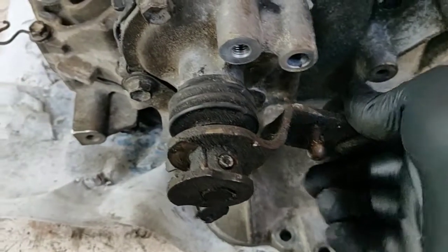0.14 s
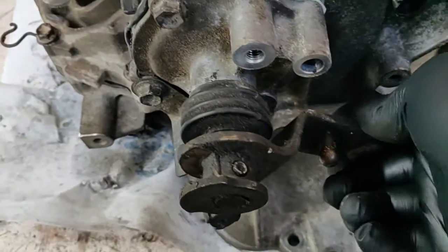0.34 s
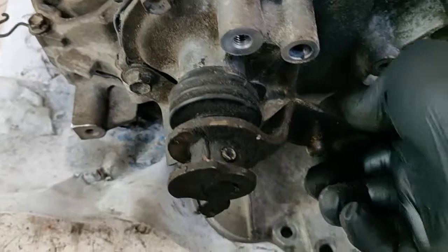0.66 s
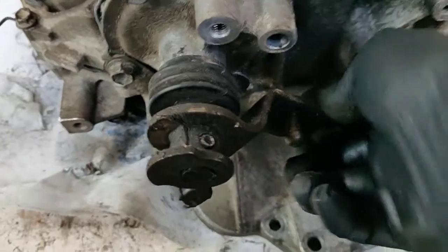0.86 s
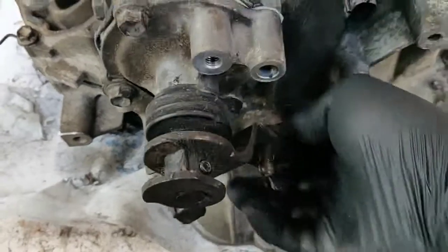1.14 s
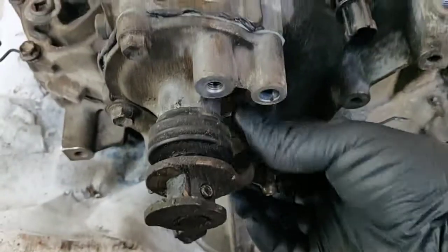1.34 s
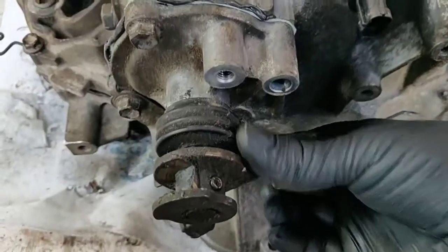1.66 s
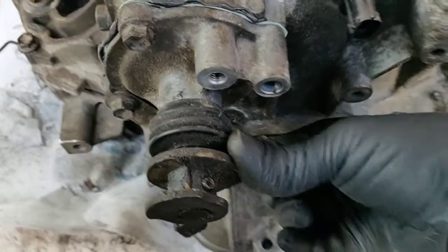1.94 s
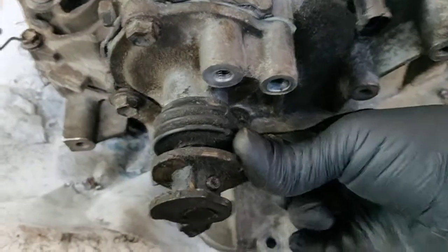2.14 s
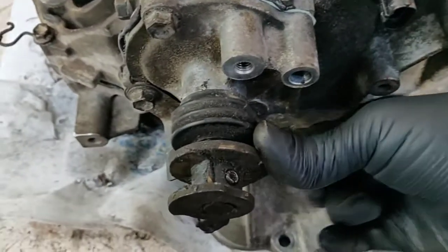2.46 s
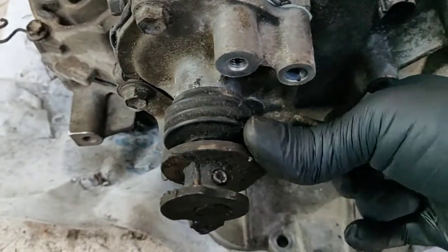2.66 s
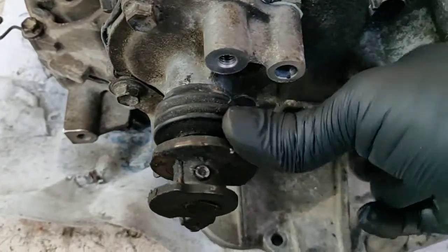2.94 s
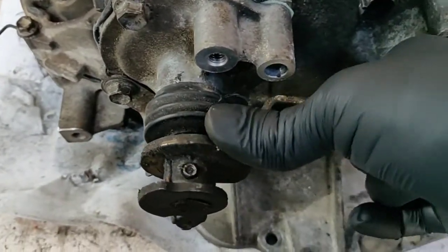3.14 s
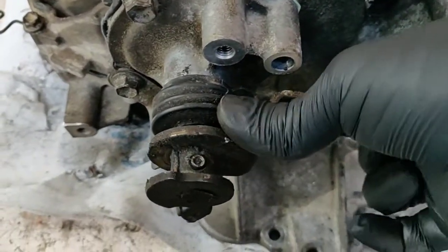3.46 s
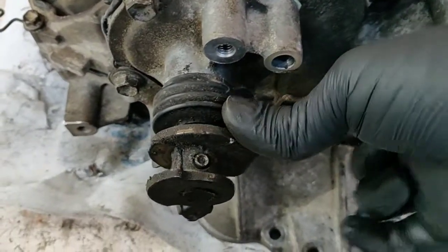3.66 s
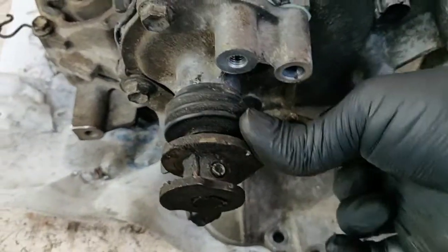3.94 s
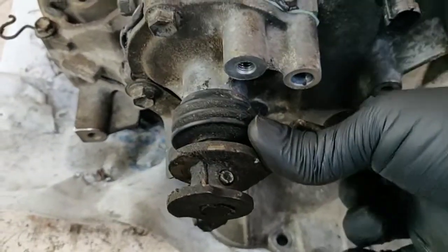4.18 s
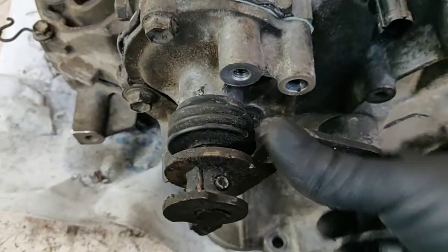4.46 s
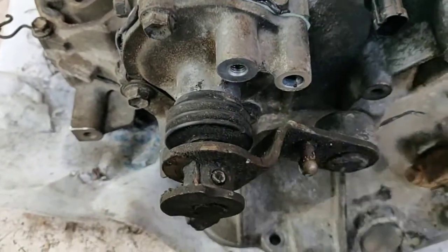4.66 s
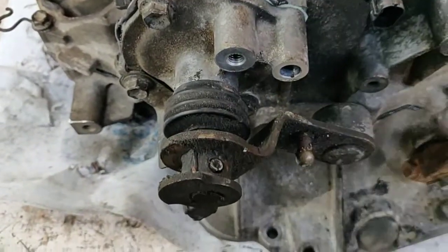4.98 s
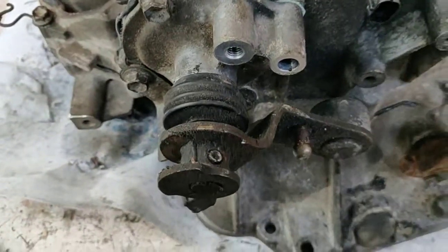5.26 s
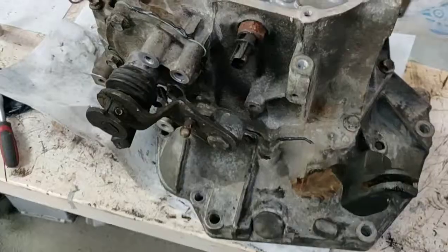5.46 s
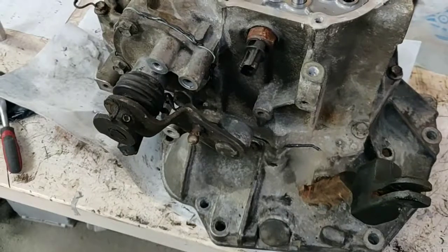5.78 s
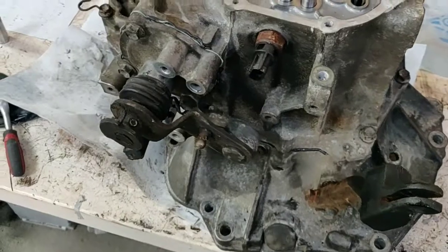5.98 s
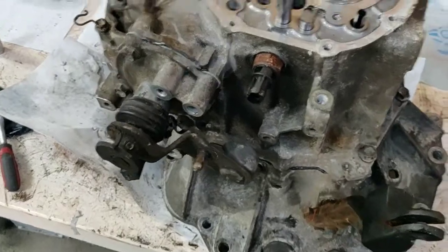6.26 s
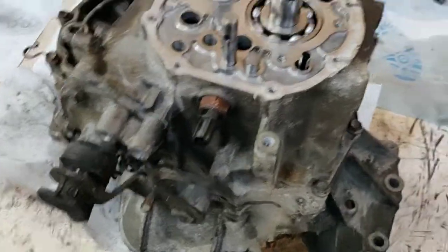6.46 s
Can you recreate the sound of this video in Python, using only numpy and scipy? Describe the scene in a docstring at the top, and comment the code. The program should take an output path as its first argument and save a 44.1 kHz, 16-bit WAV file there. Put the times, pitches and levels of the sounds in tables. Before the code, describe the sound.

Close to a phone in a small workshop, a hand works a gearbox selector over low hum and fan noise. A loud double clack lands at one second, followed by two more near three and another before four, each with a dull casing thud. Quiet fan noise remains, then the sound drops out, returns faintly with hiss, and ends in blunt taps and a short rub on the left.

```python
"""Gearbox selector on a workbench.

A gloved hand works the selector shaft of a gearbox casing close to a phone, over mains hum and fan noise.
Each shift clatters steel on steel as filtered noise and ringing modes; swelling sines thud on the bench.
Late on come a bump on the right and a tap on the left, then a dropout and a fade back.
After it: hiss, a low throb on the right, then rubbing, taps and a slide on the left."""
import sys
import numpy as np
from scipy import signal
from scipy.fft import rfft, irfft, next_fast_len
from scipy.io import wavfile
from scipy.ndimage import uniform_filter1d

SR = 44100
rng = np.random.default_rng(int(sys.argv[2]) if len(sys.argv) > 2 else 0)


def log_audio(samples):
    """Write samples as a 16-bit WAV file to the path given in sys.argv[1]."""
    # one column per channel
    frames = np.atleast_2d(samples).T
    # limit to full scale, then quantise
    limited = np.clip(frames, -1, 1)
    pcm = np.round(limited * 32767).astype(np.int16)
    wavfile.write(sys.argv[1], SR, pcm)


N = 291942


def undb(db):
    """Decibels to gain."""
    return 10 ** (np.asarray(db) / 20)


def unit(x):
    """Scale to rms 1."""
    return x / np.sqrt(np.mean(x ** 2))


def colour(x, points):
    """Causal minimum-phase filter through (hz, db) points, built by folding the cepstrum."""
    size = 2 * next_fast_len(x.shape[-1] // 2 + 2048, real=True)
    hz, db = np.transpose(points)
    f = np.maximum(np.arange(size // 2 + 1) * SR / size, 1)
    cepstrum = irfft(np.interp(np.log(f), np.log(hz), np.log(undb(db))))
    cepstrum[1:size // 2] *= 2
    cepstrum[size // 2 + 1:] = 0
    response = np.exp(rfft(cepstrum))
    return irfft(rfft(x, size) * response)[..., :x.shape[-1]]


def fall(t, t60_s):
    """Exponential decay, 60 dB in t60_s."""
    return np.exp(-np.log(1000) * t / t60_s)


def swell(start_s, attack_s, hold_s, release_s, depth_db=40):
    """Gain over time: rises and dies away at even rates in dB, spanning depth_db in attack and release."""
    t = np.arange(N) / SR
    before = (start_s + attack_s - t) / attack_s
    after = (t - start_s - attack_s - hold_s) / release_s
    return undb(-depth_db * np.maximum(0, np.maximum(before, after)))


def curve(rows):
    """Gain over time from (time_s, level_db) rows."""
    return undb(np.interp(np.arange(N) / SR, *np.transpose(rows)))


def walk(knots_per_s):
    """Slow random drift with a spread near 1."""
    knots = rng.standard_normal(N // 100)
    return np.interp(np.arange(N) / SR * knots_per_s, np.arange(len(knots)), knots)


def diffuse(size, alike_hz=700):
    """Noise from all round: the bass reaches both microphones alike, the treble does not."""
    mid, side = rfft(rng.standard_normal((2, size)))
    hz = np.arange(len(mid)) * SR / size
    alike = .96 / (1 + (hz / alike_hz) ** 3)
    shared = mid * np.sqrt(1 + alike)
    opposed = np.array([[1], [-1]]) * side * np.sqrt(1 - alike)
    return irfft(shared + opposed, size) / np.sqrt(2)


def add(out, s, x):
    """Mix x into out from time s."""
    i = int(s * SR)
    out[:, i:i + x.shape[-1]] += x[..., :N - i]


# fan and workshop air, relative spectrum: hz, density_db
AIR_SPECTRUM = [(20, -9), (55, 8.5), (90, -1), (150, -1), (200, -2.5), (280, -2), (335, -3), (500, 3.5),
                (1100, 2.5), (1800, 2), (3000, -7.5), (4700, -9.5), (6100, -9.5), (7000, -21),
                (8400, -34.5), (10000, -54.5)]
# low rumble, relative level: time_s, level_db
RUMBLE_LEVEL = [(0.0, -43), (0.71, -53.5), (4.39, -48.5), (4.68, -50), (5.03, -44), (5.15, -45),
                (5.22, -47)]
# mains harmonics, relative rms: multiple, level_db
HUM_HARMONICS = [(1, -62), (2, -40.5), (3, -48), (4, -43)]
# wavering fan tones, relative rms: pitch_hz, level_db
FAN_TONES = [(99.6, -58), (478.5, -56.5), (518.6, -47.5), (658.4, -53), (933, -53.5), (983, -59.5),
             (1196, -54.5)]


def fan(air_db=-35, rumble_db=5, rumble_swing_db=2.0, waver=0.38, hum_waver=0.1, mains_hz=59.92):
    """Steady moving air, an uneven rumble, the motor's hum and the blades' tones."""
    t = np.arange(N) / SR
    air = undb(air_db) * unit(colour(diffuse(N), AIR_SPECTRUM))

    low = [(15, -6), (40, -12), (55, -1.5), (75, -11.5), (300, -55.5), (1000, -77.5)]
    rumble = unit(colour(diffuse(N), low)) * curve(RUMBLE_LEVEL)
    rumble = rumble * undb(rumble_db + rumble_swing_db * walk(4.6))

    hum = np.zeros(N)
    for multiple, db in HUM_HARMONICS:
        hum += undb(db) * np.sin(2 * np.pi * (multiple * mains_hz * t + rng.random()))
    hum = hum * (1 + hum_waver * walk(6))

    tones = np.zeros(N)
    for hz, db in FAN_TONES:
        level = undb(db) * (1 + waver * walk(9.1))
        phase_drift_rad = 2 * waver * walk(10)
        tones += level * np.sin(2 * np.pi * hz * t + phase_drift_rad)
    return air + rumble + np.sqrt(2) * (hum + tones)  # sqrt(2): sine rms to peak


# selector against its stops: start_s, level_db, tilt_db_per_octave, first_bounce_loss_db, thud_db, thud_hz
BLOWS = [(1.028, -17, -4, -8, -20, 316), (1.0391, -6, -2, -18.5, -32, 295),
         (1.0488, -1.5, -1.5, -8, -11, 277.5), (2.003, -36, -3, -18, -55, 300),
         (2.631, -32, 13, -12, -54, 300), (2.6485, -7, 1.5, -7, -22, 315),
         (3.036, -13.5, -1, -1.5, -17.5, 300), (3.0683, -6, 0, -6, -11, 277),
         (3.4184, -37, -1, -9, -26.5, 284), (3.7684, -23.5, -1.5, -18, -43, 300),
         (3.8396, -8, -1.5, -8.5, -21, 300), (4.0425, -34.5, -3, -16, -57, 300)]
# the hand leans on the lever and rocks the casing without a click: start_s, level_db, pitch_hz
NUDGES = [(.488, -35, 265), (.983, -25.5, 316), (3.015, -24, 297)]


def rockings(lag_s=.003, back_s=0.01442, back_db=-9, back_ratio=0.868):
    """Casing thuds as (s, db, hz): to, then fro weaker and lower after each blow; once for a nudge."""
    for s, _, _, _, db, hz in BLOWS:
        yield s + lag_s, db, hz
        yield s + lag_s + back_s, db + back_db, hz * back_ratio
    yield from NUDGES


def bench(peak_s=0.0099, steepness=2.2, low_ratio=0.86, low_db=-10, high_ratio=1.204, high_db=-11):
    """The heavy casing takes a few cycles to get moving, then the bench damps it."""
    out, t = np.zeros((2, N)), np.arange(SR // 6) / SR
    heave = (t / peak_s * np.exp(1 - t / peak_s)) ** steepness
    for s, db, hz in rockings():
        turn = 2 * np.pi * hz * t
        low = undb(low_db) * np.sin(low_ratio * turn)
        high = undb(high_db) * np.sin(high_ratio * turn)
        add(out, s, undb(db) * heave * (np.sin(turn) + low + high))
    return out


def workshop(x, wet_db=-14, t60_s=0.53, delay_s=0.011):
    """A faint, diffuse echo from the walls, which swallow the highest treble."""
    t = np.arange(SR // 2) / SR
    tail = colour(diffuse(len(t)), [(6500, -3), (9000, -6), (12000, -16.0)])
    tail = tail * fall(t, t60_s) * (1 - np.exp(-(t / delay_s) ** 2))
    tail = tail / np.sqrt(t60_s * SR / np.log(10 ** 6))  # near unit energy
    return undb(wet_db) * signal.fftconvolve(x, tail, axes=1)[:, :N]


def contacts(bounces=3, touch_db=-4, seat_s=.0023, gap_s=.0062, widening=1.75, easing=0.58, bounce_tilt=-1.8):
    """Contacts as (s, db, tilt): a touch, the seating, then bounces ever further apart, weaker and duller."""
    for s, db, tilt, loss_db, _, _ in BLOWS:
        yield s, db + touch_db, tilt
        s = s + seat_s
        for k in range(bounces + 1):  # k = 0 is the seating
            yield s, db + k ** easing * loss_db, tilt + k * bounce_tilt
            s = s + gap_s * widening ** k


# casing and lever modes, relative level: pitch_hz, level_db, t60_s
CASING_MODES = [(619, -10, .12), (786, -13, .13), (958, -3, .12), (1056, -6, .12), (1220, -10, .1),
                (1330, -11, .1), (1560, -9, .1), (1930, -7, .09), (2370, -7, .1), (2464, -4, .12),
                (2560, -5, .12), (2702, 1, .13), (3006, -1, .12), (3417, -3, .12), (3705, -5, .1),
                (3970, 0, .1), (4090, 0, .09), (4265, 0, .11), (4860, -2, .08), (5160, -2, .08),
                (5639, 3, .1), (5910, 3, .1), (6072, 2, .09), (7060, -16, .08)]
# bright crack of a contact, relative spectrum: hz, density_db
CRACK_SPECTRUM = [(25, -28), (90, -17.5), (250, 6.5), (450, -10), (1000, -1.5), (2000, -6.5), (2700, -0.5),
                  (3400, -4), (4150, 3.5), (5000, 0.5), (6000, 5), (7000, -10.5), (8500, -17.5),
                  (10500, -41), (15000, -44)]
# high treble at the first instant of a contact, relative spectrum: hz, density_db
SPIT_SPECTRUM = [(3000, -28.5), (6500, 6.5), (9000, -25), (10500, -23.5), (14000, -10.5), (16000, -25)]


def selector(crack_t60_s=0.044, ring_db=-15, rise_s=0.00078, scatter_db=2.0,
             spit_db=-19, spit_t60_s=0.014, own_db=1):
    """Each contact cracks through the casing's dense short modes and leaves its strongest ones ringing."""
    out, t = np.zeros((2, N)), np.arange(SR // 6) / SR
    hz, mode_db, t60_s = np.transpose(CASING_MODES)
    modes = np.exp(2j * np.pi * hz[:, None] * t) * fall(t, t60_s[:, None])
    body = diffuse(len(t))
    for s, db, tilt in contacts():
        # all contacts share one casing, so their cracks are partly alike
        source = body + undb(own_db) * diffuse(len(t))
        tilted = [(f, d + tilt * np.log2(min(f, 6000) / 4000)) for f, d in CRACK_SPECTRUM]
        crack = unit(colour(source, tilted)) * fall(t, crack_t60_s)

        # harder contacts are shorter, so they reach higher; spit_db holds for a -6 dB contact
        spit = unit(colour(rng.standard_normal((2, len(t))), SPIT_SPECTRUM)) * fall(t, spit_t60_s)
        spit = undb(spit_db + db + 6) * spit

        # the point of contact sets how much of each mode reaches each microphone
        scatter = scatter_db * rng.standard_normal((2, len(hz)))
        share = unit(undb(mode_db + tilt * np.log2(hz / 4000) + scatter))
        phase = np.exp(2j * np.pi * rng.random(share.shape))
        ring = np.imag((share * phase) @ modes) * np.sqrt(2 / len(hz))

        onset = 1 - np.exp(-t / rise_s)
        add(out, s, undb(db) * (crack + spit + undb(ring_db) * ring) * onset)
    return out


def bump(at_s=5.2483, bump_db=-14, bump_hz=125, ring_s=0.0033):
    """The grip shifts and bumps the right port: a fast-decaying low sine."""
    t = np.maximum(np.arange(N) / SR - at_s, 0)
    right = undb(bump_db) * np.exp(-t / ring_s) * np.sin(2 * np.pi * bump_hz * t)
    return np.array([np.zeros(N), right])


# finger taps beside the left microphone: time_s, level_db, pitch_hz, ring_ms, snap_db (relative to level)
TAPS = [(5.249, -3, 1490, 0.094, -12.5), (6.1665, 8, 363, 0.18, -6), (6.344, 4, 444, .8, -8.5),
        (6.356, -19, 387, 0.8, -18), (6.3745, -10, 410, 1.2, -12.5), (6.3882, -10, 390, 1.3, -11),
        (6.5151, -12, 398, 2, -10), (6.523, -16, 420, 2.4, -16), (6.53, -10, 440, 4.5, -14)]


def taps(lead_ms=0.12, soft_ms=0.13, snap_ms=0.074, leak_db=-28):
    """Taps push the air in the left port and snap as the skin lets go; a little leaks to the right."""
    out, t = np.zeros((2, N)), np.arange(-SR // 100, SR // 50) / SR
    ms = 1000 * t
    snap = -ms / snap_ms * np.exp((1 - (ms / snap_ms) ** 2) / 2)
    sides = np.array([[1], [undb(leak_db)]])
    for s, db, hz, ring_ms, snap_db in TAPS:
        envelope = np.exp((soft_ms - np.hypot(ms, soft_ms)) / np.where(t < 0, lead_ms, ring_ms))
        press = envelope * np.cos(2 * np.pi * hz * t + np.pi / 3)
        add(out, s + t[0], undb(db) * sides * (press + undb(snap_db) * snap))
    return out


def dropout(cut_s=5.311, return_s=5.448, edge_s=0.024, silent_db=-60, return_db=-20, recover_s=0.22):
    """Gain over time: the sound cuts out, comes back faint and recovers."""
    t = np.arange(N) / SR
    silent = np.interp(t, [cut_s, cut_s + edge_s, return_s - edge_s, return_s], [0, 1, 1, 0])
    recovery = np.exp(-np.maximum(t - return_s, 0) / recover_s)
    faint_db = return_db * (t > cut_s + edge_s) * recovery
    return undb(silent * silent_db + (1 - silent) * faint_db)


def hiss(thin_db=-43.5, dark_db=-40):
    """Filtered noise on the left: a thin hiss, and a darker one that swells more slowly."""
    thin_points = [(1000, -18.0), (4000, -5), (6000, -3.5), (8500, -9.5), (10000, -34.0)]
    dark_points = [(400, -10.0), (1300, -12.0), (2200, -1.0), (3100, 6.0),
                   (4000, -21.0), (7000, -29.0), (10000, -42.0)]
    thin = unit(colour(rng.standard_normal(N), thin_points))
    thin = undb(thin_db) * thin * swell(start_s=5.41, attack_s=0.047, hold_s=0.76, release_s=0.2)
    dark = unit(colour(rng.standard_normal(N), dark_points))
    dark = undb(dark_db) * dark * swell(start_s=5.33, attack_s=0.95, hold_s=.5, release_s=.3)
    return np.array([thin + dark, np.zeros(N)])


def throb(throb_hz=47.1, rms_db=-24):
    """A brief low throb on the right: one swelling sine."""
    tone = np.sqrt(2) * np.sin(2 * np.pi * throb_hz * np.arange(N) / SR)
    right = undb(rms_db) * tone * swell(start_s=5.58, attack_s=.09, hold_s=0.13, release_s=.27)
    return np.array([np.zeros(N), right])


def rub(rub_db=-31):
    """The hand shifts against the phone's left side: dull noise lingers as the throb dies."""
    points = [(10, 11), (25, -3), (60, -12), (150, -14), (300, -26), (800, -53), (3000, -80)]
    dull = unit(colour(rng.standard_normal(N), points))
    left = undb(rub_db) * dull * swell(start_s=5.95, attack_s=.12, hold_s=0.4, release_s=.4)
    return np.array([left, np.zeros(N)])


# sliding skin, relative spectrum: hz, density_db
SKIN_SPECTRUM = [(60, -15), (200, -5.5), (450, -1.5), (1000, -3.5), (2200, -13.5), (3400, -9),
                 (5000, -16.5), (9000, -27), (10500, -73)]


def slide(slide_db=-14.5, grip=0.83):
    """A finger slides over the left port: sticking and slipping skin makes spiky noise."""
    strength = np.exp(grip * np.clip(rng.standard_normal(N), -2, 2))
    slips = unit(colour(rng.standard_normal(N) * strength, SKIN_SPECTRUM))
    left = undb(slide_db) * slips * swell(start_s=6.505, attack_s=0.026, hold_s=.021, release_s=0.027)
    return np.array([left, np.zeros(N)])


# colour difference of the two microphone ports: hz, left_minus_right_db
PORT_DIFFERENCE = [(110, -0.5), (400, 2.5), (1300, 4), (1800, 5.5), (2600, 10.5), (3600, 8), (4500, 2.5),
                   (5300, -2.5), (6000, -8.5), (7000, -5.5), (9000, 2), (12000, -8.5)]


def ports(left, right):
    """Each port colours its side by half the difference, in opposite senses."""
    left = colour(left, [(hz, db / 2) for hz, db in PORT_DIFFERENCE])
    right = colour(right, [(hz, -db / 2) for hz, db in PORT_DIFFERENCE])
    return np.array([left, right])


def scene(fan_db=-1.69):
    """The gearbox and the room, heard through two ports, with the handling on top."""
    gearbox = bench() + selector()
    left, right = undb(fan_db) * fan() + gearbox + workshop(gearbox)
    handling = bump() + taps() + hiss() + rub() + slide()
    return (ports(left, right) + handling) * dropout() + throb()


def gain_control(x, threshold_db=-19, slope=0.18, over_release_db_per_s=3.5):
    """Power over the threshold turns the gain down by slope dB per dB; the gain creeps back up."""
    power = uniform_filter1d(np.mean(x ** 2, axis=0), size=SR // 40)
    over_db = np.maximum(10 * np.log10(np.maximum(power, 1e-12)) - threshold_db, 0)
    creep_db = over_release_db_per_s * np.arange(N) / SR
    held_db = np.maximum.accumulate(over_db + creep_db) - creep_db
    return x * undb(-slope * held_db)


def record(dry, peak=.9, top_hz=15800):
    """The phone rides the gain, rounds the loudest peaks and cuts the top."""
    ridden = gain_control(dry)
    rounded = ridden / (1 + (ridden / peak) ** 4) ** .25
    lowpass = signal.ellip(8, .2, 70, top_hz, fs=SR, output="sos")
    return signal.sosfilt(lowpass, rounded)


dry = scene()
out = record(dry)
log_audio(out)
```